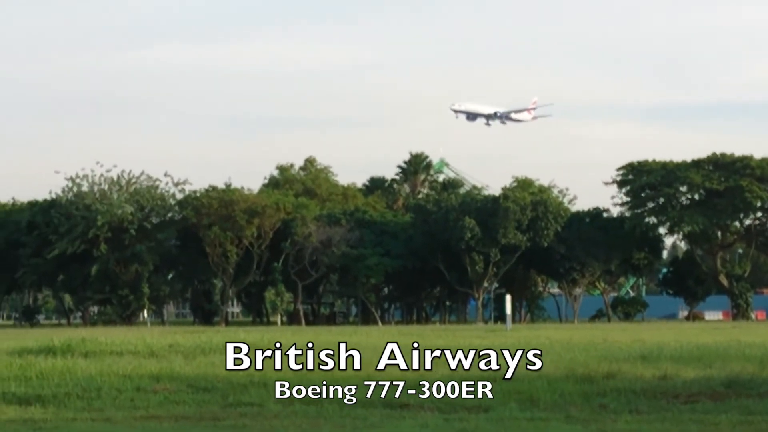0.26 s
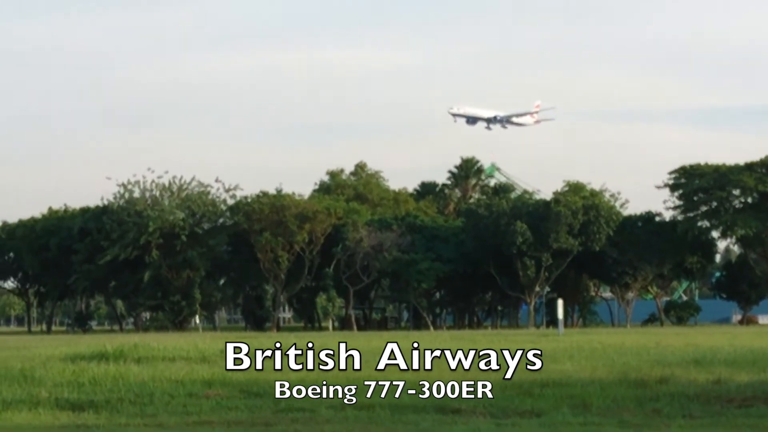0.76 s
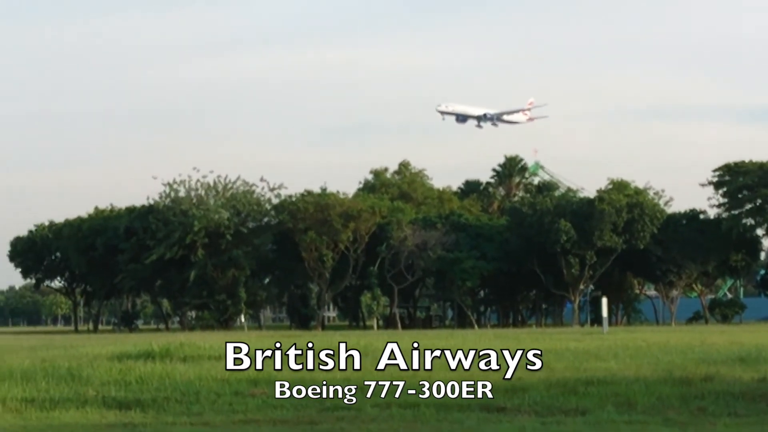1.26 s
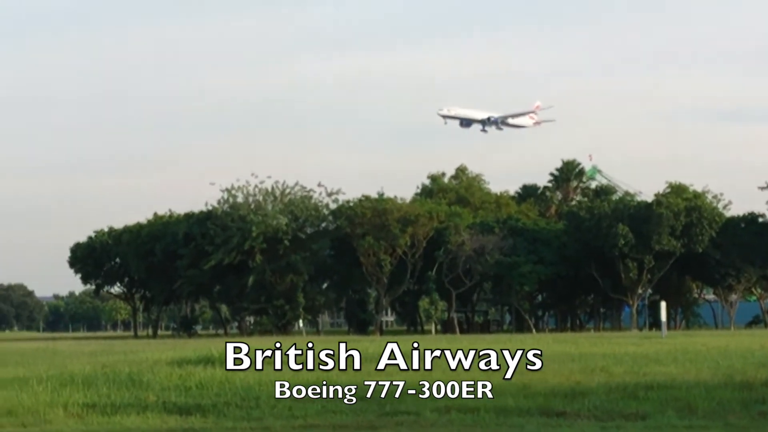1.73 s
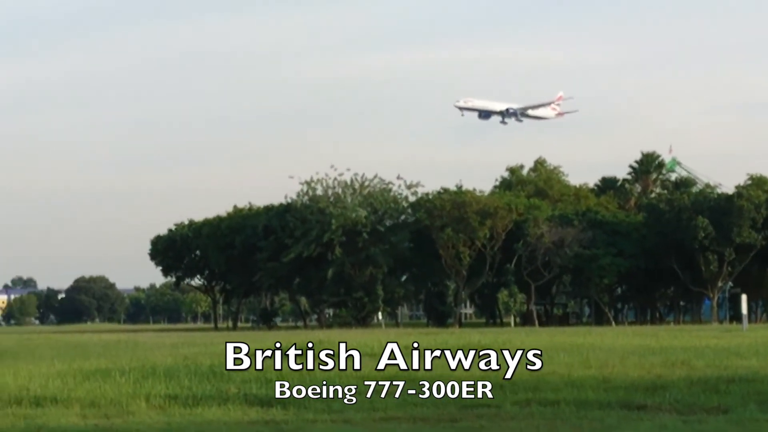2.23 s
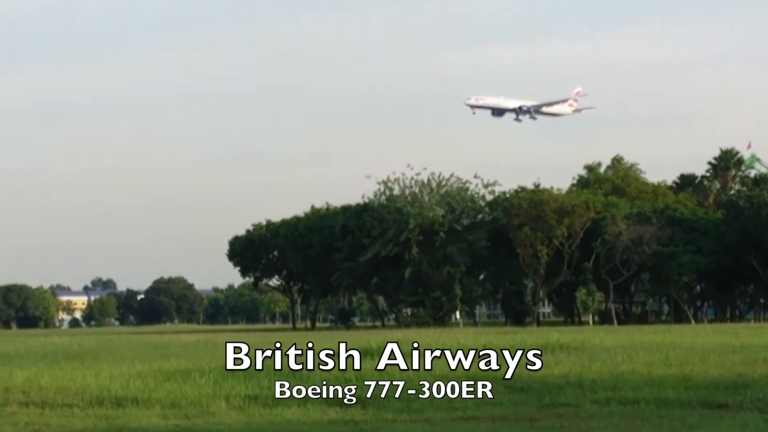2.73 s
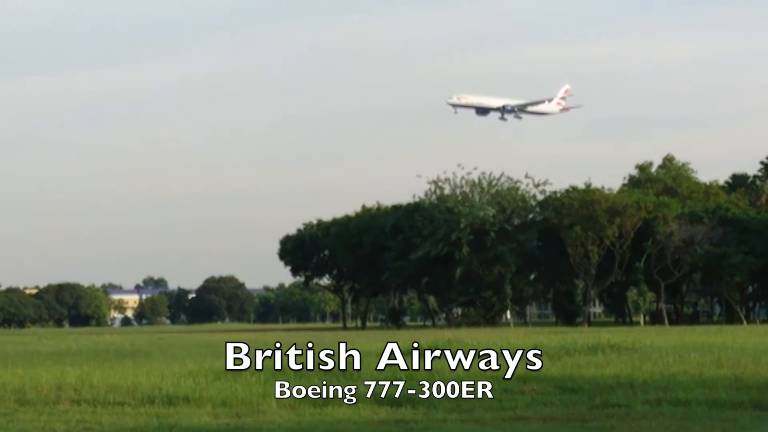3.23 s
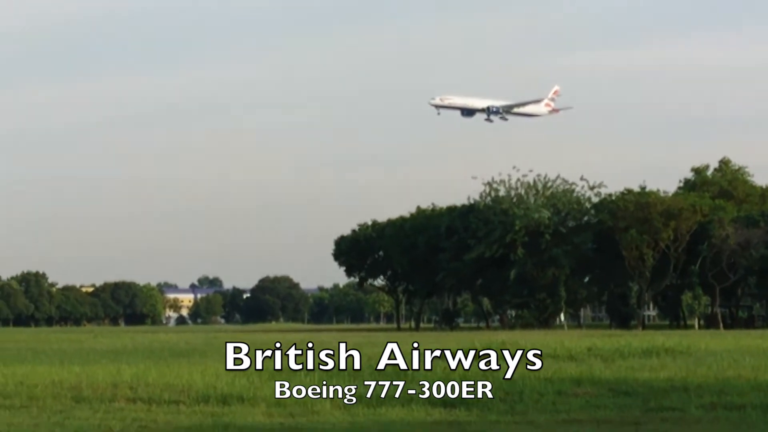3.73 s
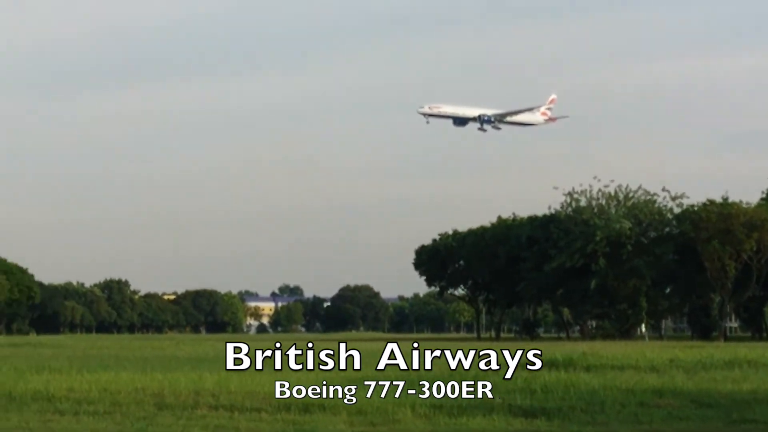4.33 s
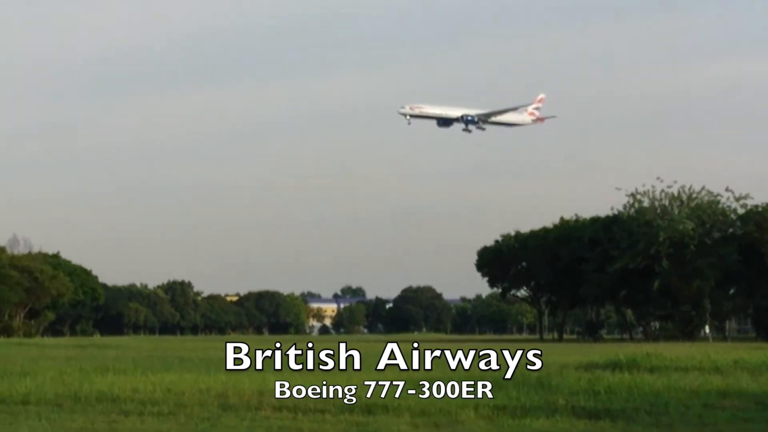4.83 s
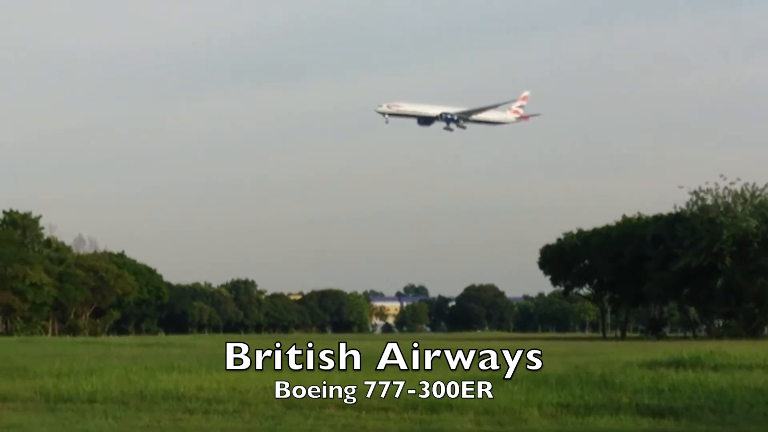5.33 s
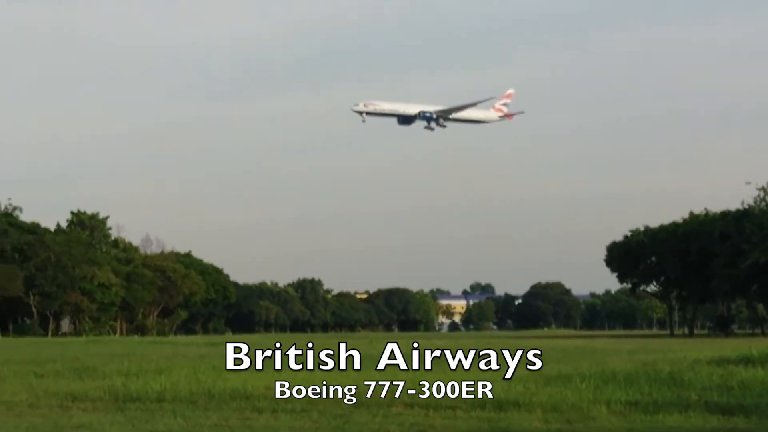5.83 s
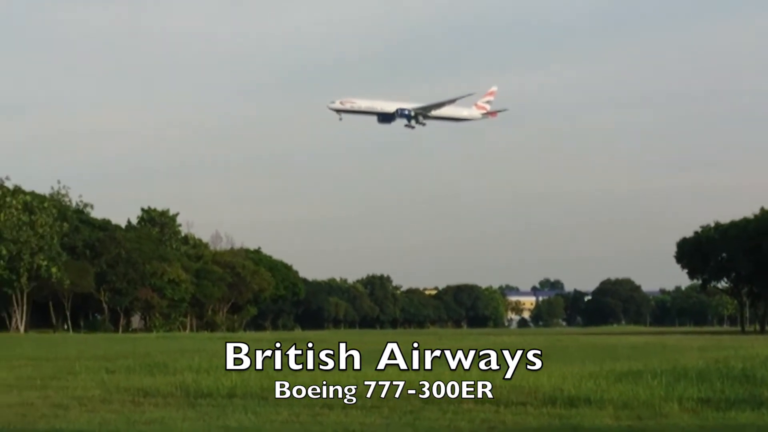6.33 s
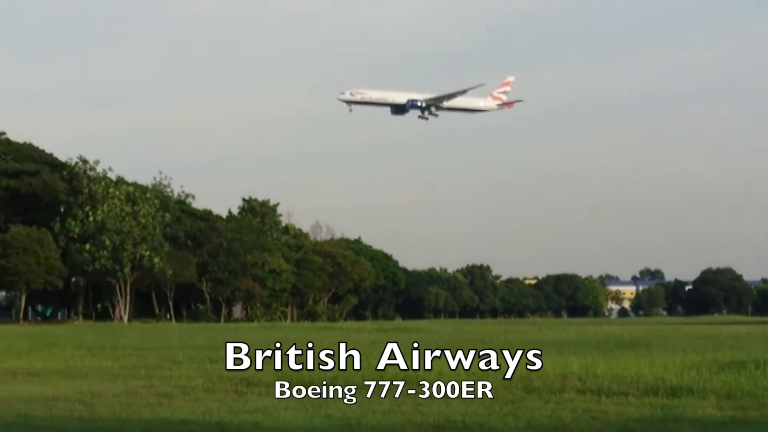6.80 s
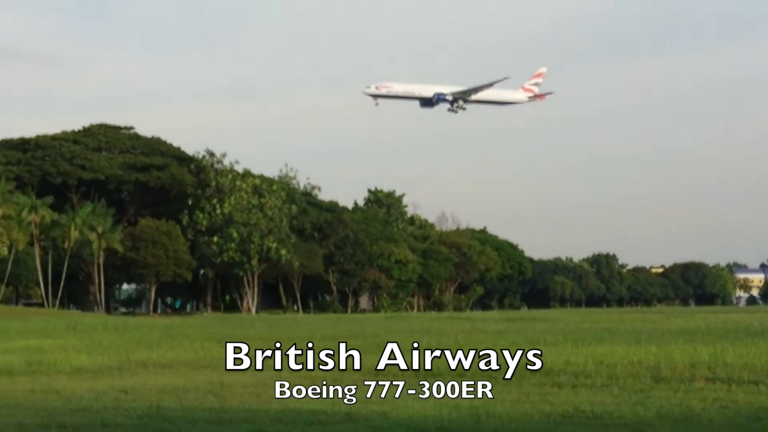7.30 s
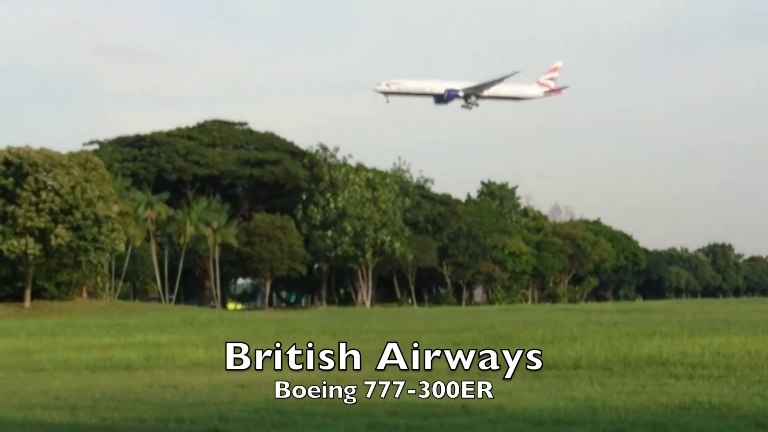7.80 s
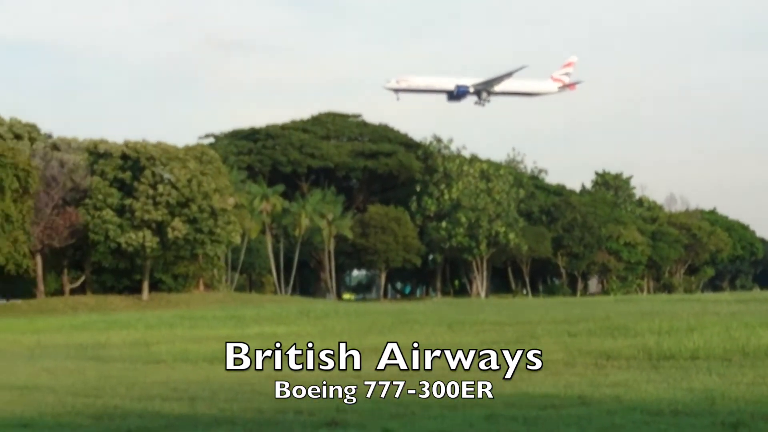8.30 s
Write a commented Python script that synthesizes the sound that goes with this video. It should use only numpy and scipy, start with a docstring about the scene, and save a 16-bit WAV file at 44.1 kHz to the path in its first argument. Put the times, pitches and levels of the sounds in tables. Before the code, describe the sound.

An airliner on approach crosses open grass. Soft low rumble and faint airy rush grow into a hollow, uneven roar with wavering fan tones and thin high whine. At about two and five seconds, a very loud crack and thump overloads the left microphone, briefly dipping the level. The roar gets fuller and hissier as the jet draws level, still sounding at the end. Outdoor handheld stereo, left side duller.

```python
"""Airliner passing low over a field

A twin-engine airliner on approach passes over grass: bands of patchy noise make the exhaust roar, airframe rush
and hiss; wavering tones make the fan and compressor notes, the fan following the throttle. A wing whistle sinks
with the Doppler shift, low rumble swells underneath, and twice a jolt, a falling crack and a slowing ring,
overloads the left microphone."""
import sys
import numpy as np
from scipy import signal
from scipy.fft import rfft, irfft, next_fast_len
from scipy.io import wavfile
from scipy.ndimage import uniform_filter1d, map_coordinates

SR = 44100
rng = np.random.default_rng(int(sys.argv[2]) if len(sys.argv) > 2 else 0)


def store_wav(level_fs):
    """Save 16-bit WAV to argv[1]."""
    pcm = np.round(np.clip(np.atleast_2d(level_fs), -1, 1) * 32767)
    wavfile.write(sys.argv[1], SR, pcm.T.astype(np.int16))


N = 377143

# Noise colours, relative within each band: pitch_hz, density_db_per_hz
RUMBLE_SPECTRUM = [(15, -47), (25, -29.5), (40, -11.5), (56, 3.5), (90, 0.5), (125, -1), (170, -7),
                   (230, -17), (330, -19), (700, -99.5)]
# hollow boom that rides on the rumble during the approach: pitch_hz, density_db_per_hz
BOOM_SPECTRUM = [(50, -40), (85, -3), (105, 2), (140, -.5), (175, -6.5), (230, -25.5), (400, -73.5)]
# air rushing over the airframe: pitch_hz, density_db_per_hz
RUSH_SPECTRUM = [(300, -36), (700, 3.5), (950, 4.5), (1350, 0), (1800, -0.5), (2350, 2), (2750, -2),
                 (3150, -8.5), (3550, -17), (4500, -36), (6000, -70), (8000, -110)]
# engine hiss: pitch_hz, density_db_per_hz
HISS_SPECTRUM = [(1500, -25), (3000, 0.5), (3550, 5.5), (4100, 2), (4600, -2.5), (5050, -7.5), (5500, -12),
                 (6200, -12), (6800, -20), (7300, -29), (7900, -87)]
# the turbine's band of hiss, beamed sideways: pitch_hz, density_db_per_hz
TURBINE_SPECTRUM = [(3300, -59.5), (3750, -8.5), (4050, 2), (4400, 0.5), (4700, -3), (5000, -11.5),
                    (5800, -55.5)]
# jet mixing: pitch_hz, density_db_per_hz
MIXING_SPECTRUM = [(70, -30), (130, -8.5), (170, 6), (220, -8.5), (290, -6.5), (380, -17.5), (600, -79)]
# lower exhaust roar: pitch_hz, density_db_per_hz
LOW_ROAR_SPECTRUM = [(100, -20.5), (200, -14), (290, -8), (380, -2), (460, -2.5), (540, -9), (700, -30.5),
                     (1500, -89)]
# upper exhaust roar: pitch_hz, density_db_per_hz
ROAR_SPECTRUM = [(380, -30), (460, -5), (540, 0), (620, 0), (710, -3), (820, -14), (1080, -14),
                 (1350, -22.5), (2000, -23.5), (4000, -98)]

# Level rides, before each layer's trim and flutter. Low rumble: start_s, level_db
RUMBLE_RIDE = [(0.0, -29.5), (0.25, -34.5), (0.85, -30.5), (1.3, -26.5), (1.9, -25), (2.1, -19.5),
               (2.2, -27), (2.4, -22.5), (3.0, -27), (3.45, -24.5), (3.7, -25.5), (4.5, -27), (4.85, -24),
               (5.25, -30.5), (5.85, -24), (5.95, -28.5), (6.3, -27.5), (6.45, -25.5), (7.5, -27.5),
               (7.65, -22.5), (8.3, -31), (8.55, -30.5)]
# hollow boom: start_s, level_db
BOOM_RIDE = [(0, -52), (1.05, -39.5), (1.35, -28), (2.05, -25.5), (2.22, -28), (2.4, -22.5), (2.75, -25),
             (2.95, -31.5), (3.4, -28), (4.0, -43), (8.55, -50.5)]
# engine hiss: start_s, level_db
HISS_RIDE = [(0.0, -57), (3.95, -48), (4.25, -52), (5.1, -48), (5.55, -51), (5.9, -50), (7.2, -48),
             (7.4, -44), (7.65, -43), (8.2, -47.5), (8.55, -47.5)]
# lower exhaust roar, which jet mixing follows: start_s, level_db
LOW_ROAR_RIDE = [(0.0, -46), (0.09, -44.5), (1.4, -38), (3.26, -37), (3.29, -35), (3.95, -31.5),
                 (4.4, -38.5), (5.14, -34), (5.17, -29.5), (5.22, -34.5), (6.57, -36.5), (6.74, -30),
                 (7.12, -39.5), (7.33, -31.5), (7.57, -37.5), (7.69, -29), (8.02, -37), (8.55, -32)]
# upper exhaust roar, swelling and fading on its way through the air: start_s, level_db
ROAR_RIDE = [(0.0, -46), (1.05, -40.5), (1.45, -35.5), (1.83, -33), (2.3, -34.5), (2.95, -35.5),
             (3.07, -31), (3.36, -32), (3.47, -28), (3.72, -28), (3.85, -31), (4.26, -30), (4.48, -36.5),
             (4.98, -29.5), (5.24, -33), (5.32, -27), (5.45, -28.5), (5.6, -32), (5.82, -29.5),
             (6.15, -31.5), (6.28, -34.5), (6.38, -31), (6.5, -34), (6.8, -30), (7.0, -35), (7.35, -31),
             (7.5, -33), (7.72, -27), (8.151, -35), (8.38, -32), (8.55, -34.5)]
# wing whistle, fading and flaring on its own: start_s, level_db
WHISTLE_RIDE = [(0, -51), (0.55, -41.5), (1.3, -41.5), (1.65, -33), (2.2, -39.5), (3.0, -40.5),
                (3.2, -30.5), (3.52, -28.5), (3.8, -44), (4.15, -30.5), (4.4, -47.5), (4.65, -39.5),
                (4.85, -48), (5.05, -31), (5.5, -43), (5.8, -37.5), (6.2, -44.5), (6.58, -31.5),
                (6.85, -34.5), (7.3, -46.5), (7.6, -28), (7.9, -38.5), (8.55, -42)]
# blade-passing tone, fading and flaring on its own: start_s, level_db
BLADE_RIDE = [(0, -54), (1.3, -56), (1.85, -43.5), (2.3, -35.5), (2.55, -39.5), (3.25, -45), (3.5, -27),
              (3.85, -40.5), (4.45, -49), (5.1, -38), (7.3, -47.5), (7.68, -23.5), (8.1, -37),
              (8.22, -30.5), (8.38, -24), (8.55, -40)]
# upper fan harmonics, beamed forward from the intake: start_s, level_db
INTAKE_RIDE = [(0, -66.5), (1.8, -55), (2.35, -50.5), (2.7, -50.5), (3.2, -44), (3.7, -41.5), (4.2, -55.5),
               (5.3, -69), (8.55, -62)]

# throttle opens, closes to idle and opens again: start_s, blade rate at the engine pitch_hz
FAN_SPEED = [(0, 492), (1.0, 508.6), (2.3, 558.3), (3.0, 533), (3.9, 498.8), (4.8, 445), (7.1, 440.8),
             (7.65, 495.3), (8.0, 522), (8.55, 528.3)]
# upper fan harmonics: multiple of the blade rate, level_db relative to the intake ride
INTAKE_HARMONICS = [(2, 2.5), (4, -10), (5, -0.5)]
# compressor and turbine tones come into earshot one after another: start_s, end_s,
# pitch_hz at the engine (fan at approach speed), fan_follow (exponent), level_db, left_right_db
WHINE_LINES = [(-.2, 1.8, 3605, 0, -61, -6), (-.05, 1.9, 4020, .3, -66, -12),
               (2.2, 4.2, 4110, .13, -60.5, -22), (3.1, 5.2, 3605, 0, -54, -7),
               (3.35, 4.2, 3175, 0, -54, -5), (3.1, 4.15, 4620, .27, -63.5, -22),
               (4.25, 5.2, 4095, .13, -59.5, -18), (4.8, 5.9, 3325, 0, -53, 5),
               (5.2, 7.1, 3715, 0, -55, -4), (5.4, 7.2, 4140, 0, -64.5, -16), (5.76, 7.35, 3310, 0, -55, 2),
               (7.26, 7.54, 3630, 0, -45, -2), (7.45, 7.9, 3630, 0, -53, 1),
               (7.48, 7.92, 4080, .1, -46.5, -12), (7.78, 8.3, 4110, .2, -54, -12),
               (7.45, 7.95, 4580, .1, -55.5, -26), (7.48, 7.82, 3090, .2, -48, -8),
               (7.7, 8.15, 3090, .2, -54.5, -8)]
# jolts: start_s, thump_db, start_pitch_hz, end_pitch_hz, ring_rise_s, ring_life_s, # crack_db (before trim),
# crack_pitch_hz, crack_rise_s, fizz_share
JOLT_HITS = [(2.1310, 5.6, 262, 67, .0035, .0148, -6, 2250, .0007, .005),
             (5.1654, 3.6, 274, 74, .0007, .0135, 4, 2400, .00023, .028)]

# stereo width of the noise: pitch_hz, left_right_likeness (0-1)
LIKENESS = [(40, .88), (150, .96), (250, .88), (350, .95), (580, .975), (720, .88), (860, .52), (1100, .72),
            (1300, .5), (1520, .62), (1900, .2), (2700, .34), (3200, .15), (4100, .45), (4500, .35),
            (4900, .04)]
# the left microphone is the duller one: pitch_hz, left_right_db
LEFT_SHADE = [(30, 6), (80, -5), (200, -5), (500, -6), (720, -5.5), (860, -10.5), (1050, -6), (1400, -8.5),
              (2000, -1), (2700, -6.5), (3400, -4), (3900, -6), (4400, -19.5), (5000, -31.5), (6000, -34)]
# the aircraft is to the right, so the left microphone lags: pitch_hz, lag_rad
LEFT_LAG = [(40, 0), (130, .12), (330, .45), (700, .68), (880, .35), (1100, .65), (1700, 1.85), (2800, 2.4),
            (3150, .4), (3450, 1.1), (4050, 4.6), (4650, 4.9)]

# the pass: when the aircraft is abeam, the time it takes to fly its own distance, its speed (Mach)
ABEAM_S, PASS_S, MACH = 7.5, 7.3, .135
# rush level at the usual roar level, and dB gained per dB of roar swell
RUSH_DB, RUSH_GROWS, USUAL_ROAR_DB = -35, 0.27, -34
# jet mixing beams rearward: dB against the lower roar ride ahead and behind, and when and how fast it turns
MIXING_AHEAD_DB, MIXING_BEHIND_DB, TURN_S, TURN_SPREAD_S = -24, -2.5, 6.65, 0.37
# turbine hiss: level, when it sweeps past, half its stay
TURBINE_DB, TURBINE_S, TURBINE_SPREAD_S = -52, 7.63, .27
# fan blade rate at approach speed, and the whistle's pitch before the Doppler shift
APPROACH_HZ, WHISTLE_HZ, WHISTLE_FLUTTER_DB = 500, 450, 1.6
# the tones waver more once they have to cross the exhaust
WHINE_FLUTTER_DB, WHINE_WAVER_HZ, WHINE_WAVER_BEHIND_HZ, WHINE_FADE_S = 1.4, 14, 27, .14
THUMP_DELAY_S = .0013
# top edge of the aircraft's sound through the air, and the recorder's band limit
AIR_HZ, TOP_HZ = 8200, 16000
# an overload turns the gain down, and it creeps back
DUCK_DB_PER_S, RECOVER_S = 400, .35


def amp(db):
    """Decibels to gain."""
    return 10 ** (np.asarray(db) / 20)


def unit(x):
    """Scale to rms 1."""
    return x / np.sqrt(np.mean(x ** 2) + 1e-20)


def along(points, hz):
    """Read a (pitch, value) curve along a log pitch axis."""
    f, v = np.transpose(points)
    return np.interp(np.log(hz + 1), np.log(f + 1), v)


def ride(rows):
    """Draw a (time, value) table as one value per sample."""
    s, value = np.transpose(rows)
    return np.interp(np.arange(N) / SR, s, value)


def wobble(rate):
    """A smooth random curve, rate knots a second."""
    knots = rng.standard_normal(int(N * rate / SR) + 4)
    coarse = np.arange(0, N, 32)
    return np.interp(np.arange(N), coarse, map_coordinates(knots, [coarse * rate / SR]))


def filtered(x, response):
    """Shape x by a complex response of frequency."""
    m = next_fast_len(N + SR // 4)
    return irfft(rfft(x, m) * response(np.fft.rfftfreq(m, 1 / SR)), m)[..., :N]


def panned(balance_db):
    """Left and right gains whose mean is 1."""
    left = amp(balance_db)
    return 2 * np.array([left, np.ones_like(left)]) / (1 + left)


def turbulence(spectrum, patchy_db):
    """Stereo noise, rms 1 in the middle, with patches where the moving air focuses or scatters it."""
    grains = signal.stft(rng.standard_normal((2, N)), nperseg=1024)[2]
    patches = uniform_filter1d(rng.standard_normal(grains.shape[1:]), size=6, axis=0)
    patches = uniform_filter1d(patches, size=12, axis=1)
    pair = signal.istft(grains * amp(patchy_db * unit(patches)), nperseg=1024)[1][:, :N]

    def mid_side(hz):
        # the wider the angle, the less alike left and right become
        angle = np.arccos(np.clip(along(LIKENESS, hz), -1, 1)) / 2
        return amp(along(spectrum, hz)) * [np.cos(angle), np.sin(angle)]

    mid, side = filtered(pair, mid_side)
    both = filtered(np.array([mid + side, mid - side]), lambda hz: panned(along(LEFT_SHADE, hz)))
    return both / both.mean(axis=0).std()


def tone(pitch, width_hz, scatter):
    """A tone heard through turbulent air: a direct ray plus a randomly fading scattered part."""
    phase = 2 * np.pi * np.cumsum(pitch) / SR
    in_step = (1 + scatter * wobble(width_hz)) * np.cos(phase)
    out_of_step = scatter * wobble(width_hz) * np.sin(phase)
    return unit(in_step + out_of_step)


def doppler():
    """Heard pitch over emitted pitch along a straight, level pass."""
    t = np.arange(N) / SR - ABEAM_S
    return 1 / (1 + MACH * t / np.hypot(t, PASS_S))


def behind():
    """Near 0 while the aircraft approaches, near 1 once its exhausts face the listener."""
    return .5 + .5 * np.tanh((np.arange(N) / SR - TURN_S) / (2 * TURN_SPREAD_S))


def rumble():
    """Low noise that swells underneath."""
    level_db = ride(RUMBLE_RIDE) + 0.52 + 0.22 * wobble(7.4)
    return amp(level_db) * turbulence(RUMBLE_SPECTRUM, patchy_db=1.0)


def boom():
    """A hollow band of noise riding on the rumble during the approach."""
    return amp(ride(BOOM_RIDE)) * turbulence(BOOM_SPECTRUM, patchy_db=1.5)


def jolts():
    """A short falling crack, then a low ring in the left channel that slows over a few cycles."""
    out, t = np.zeros(N), np.arange(SR // 10) / SR
    for (start_s, thump_db, start_hz, end_hz, ring_rise_s, life_s,
         crack_db, snap_hz, crack_rise_s, fizz) in JOLT_HITS:
        pitch = end_hz + (start_hz - end_hz) * np.exp(-t / .0045)
        ring = (1 - np.exp(-t / ring_rise_s)) / (1 + (t / life_s) ** 3.2)
        thump = amp(thump_db) * ring * np.sin(2 * np.pi * np.cumsum(pitch) / SR)
        age = t / crack_rise_s
        crack_hz = 550 + (snap_hz - 550) * np.exp(-age / 2)
        snap = np.sin(2 * np.pi * np.cumsum(crack_hz) / SR) + fizz * rng.standard_normal(len(t))
        crack = amp(crack_db - 1.0) * snap * age * np.exp(1 - age)
        out[round(start_s * SR):][:len(t)] += crack
        out[round((start_s + THUMP_DELAY_S) * SR):][:len(t)] += thump
    return out * amp([[0], [-25]])  # the right side gets only a trace


def airframe_rush(eddies):
    """Air tearing over the airframe: a broad rush that follows part of the roar's swell."""
    swell_db = ride(ROAR_RIDE) - USUAL_ROAR_DB
    level_db = RUSH_DB + RUSH_GROWS * swell_db + 0.36 * eddies
    return amp(level_db) * turbulence(RUSH_SPECTRUM, patchy_db=0.8)


def whistle():
    """Air blowing over a cavity in the wing: a tone that comes and goes, sinking with the Doppler shift."""
    note = tone(WHISTLE_HZ * doppler(), width_hz=14, scatter=0.35)
    fluttering = unit(amp(WHISTLE_FLUTTER_DB * wobble(11)) * note)
    return amp(ride(WHISTLE_RIDE)) * fluttering * panned([-5.5])


def whines():
    """Compressor and turbine tones fade in and out as fuzzy high lines, wavering in the turbulent air."""
    out, t = np.zeros((2, N)), np.arange(N) / SR
    speed, shift = ride(FAN_SPEED) / APPROACH_HZ, doppler()
    waver_hz = WHINE_WAVER_HZ + (WHINE_WAVER_BEHIND_HZ - WHINE_WAVER_HZ) * behind()
    for start_s, end_s, pitch_hz, fan_follow, level_db, balance_db in WHINE_LINES:
        fade = np.clip(np.minimum(t - start_s, end_s - t) / WHINE_FADE_S, 0, 1)
        wavering = pitch_hz * shift * speed ** fan_follow + waver_hz * wobble(22)
        flicker = amp(level_db + WHINE_FLUTTER_DB * wobble(22))
        line = flicker * tone(wavering, width_hz=115, scatter=1.7)
        out += fade * line * panned([balance_db])
    return out


def fan():
    """The blade-passing tone and its harmonics rise and fall in pitch with the throttle."""
    pitch = ride(FAN_SPEED) * doppler()
    blades = amp(ride(BLADE_RIDE)) * tone(pitch, width_hz=26, scatter=0.6)
    upper = sum(amp(level_db) * tone(round(multiple) * pitch, width_hz=80, scatter=1.1)
                for multiple, level_db in INTAKE_HARMONICS)
    intake = amp(ride(INTAKE_RIDE) + 0.64 * wobble(8.4)) * upper
    return blades * panned([-5.7]) + intake * panned([-11.])


def engine_hiss(eddies):
    """High engine noise, strongly patched by the moving air."""
    level_db = ride(HISS_RIDE) - 1.5 + 0.4 * eddies
    return amp(level_db) * turbulence(HISS_SPECTRUM, patchy_db=2.0)


def turbine_hiss():
    """A band of hiss beamed sideways from the turbine, which sweeps past the listener."""
    beam = 1 / (1 + np.abs((np.arange(N) / SR - TURBINE_S) / TURBINE_SPREAD_S) ** 8)
    return beam * amp(TURBINE_DB + 2.3 * wobble(22)) * turbulence(TURBINE_SPECTRUM, patchy_db=3.5)


def jet_mixing():
    """Low noise of the jet mixing with the air, beamed rearward so it grows as the aircraft passes."""
    beam_db = MIXING_AHEAD_DB + (MIXING_BEHIND_DB - MIXING_AHEAD_DB) * behind()
    return amp(ride(LOW_ROAR_RIDE) + beam_db) * turbulence(MIXING_SPECTRUM, patchy_db=0.5)


def exhaust_roar(eddies):
    """The exhaust's turbulent roar in a lower and an upper band, each with its own swells."""
    low_db = ride(LOW_ROAR_RIDE) + 3.0 + 0.53 * eddies
    high_db = ride(ROAR_RIDE) + 2.5 + 0.33 * eddies
    low = amp(low_db) * turbulence(LOW_ROAR_SPECTRUM, patchy_db=-0.04)
    high = amp(high_db) * turbulence(ROAR_SPECTRUM, patchy_db=1.5)
    return low + high


def scene():
    """The aircraft's sound loses its top in the air and lags at the left microphone; jolts go on top."""
    eddies = wobble(13)  # the same eddies make the exhaust, rush and engine hiss flutter
    aircraft = rumble() + boom() + airframe_rush(eddies) + whistle() + whines() + fan()
    aircraft += engine_hiss(eddies) + turbine_hiss() + jet_mixing() + exhaust_roar(eddies)

    def path(hz):
        air = 1 / (1 + (hz / AIR_HZ) ** 24)
        return air * np.exp(-1j * along(LEFT_LAG, hz) * np.array([[1], [0]]))

    return filtered(aircraft, path) + jolts()


def record(dry):
    """The recorder ducks its gain after an overload, clips at full scale and cuts above its band limit."""
    overload = np.abs(dry).max(axis=0) > 1
    recovery = np.exp(-1 / (RECOVER_S * SR))
    duck_db = signal.lfilter([DUCK_DB_PER_S / SR], [1, -recovery], overload * 1.)
    clipped = np.clip(dry * amp(-duck_db), -1, 1)
    return filtered(clipped, lambda hz: 1 / (1 + (hz / TOP_HZ) ** 60))


dry = scene()
out = record(dry)
store_wav(out)
```